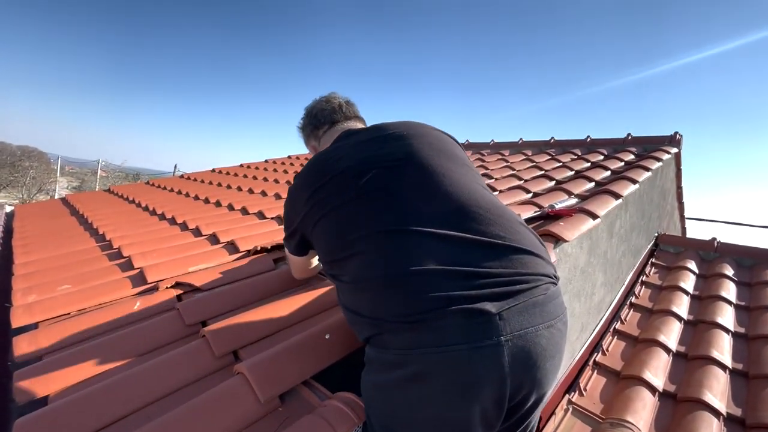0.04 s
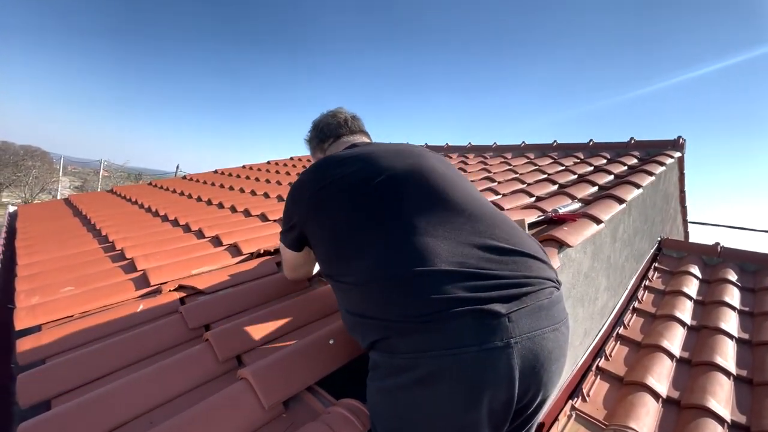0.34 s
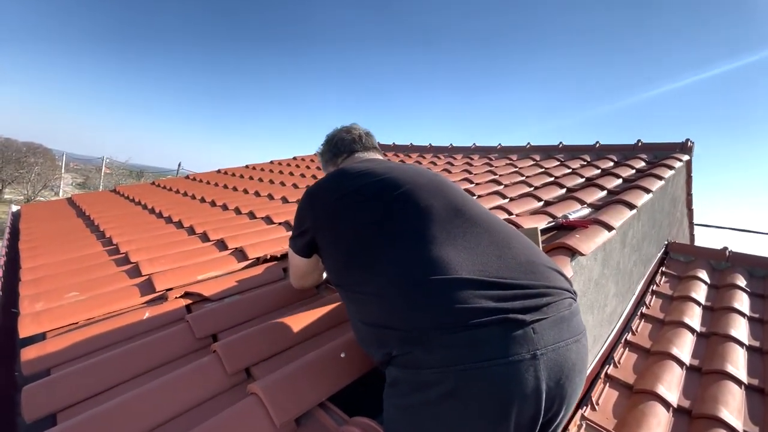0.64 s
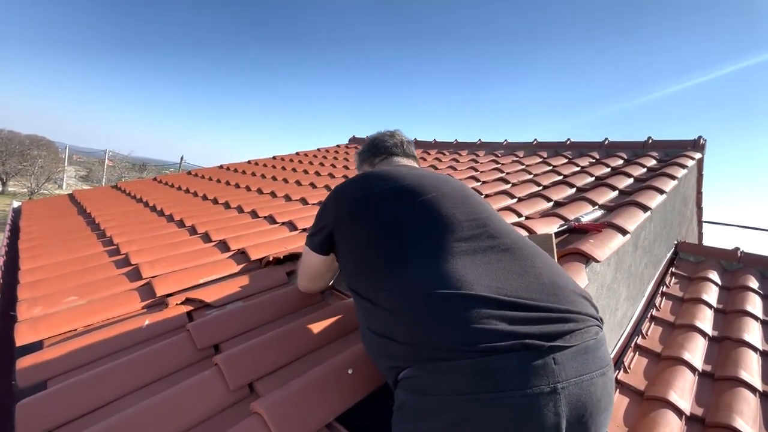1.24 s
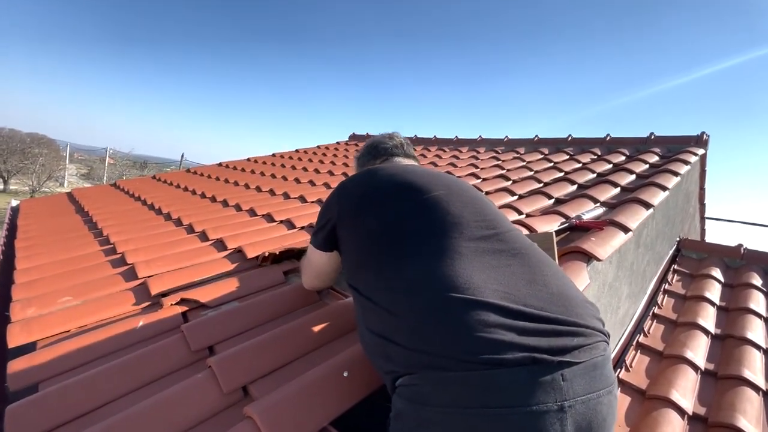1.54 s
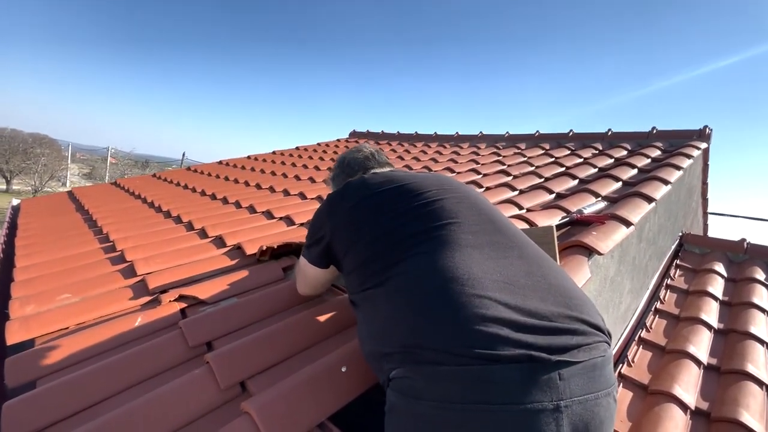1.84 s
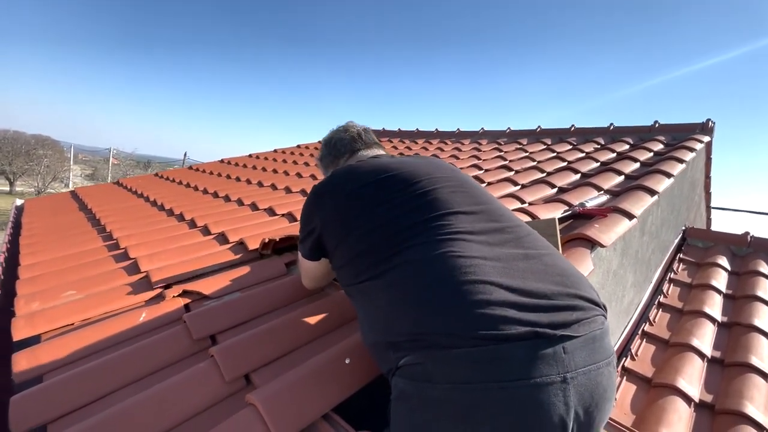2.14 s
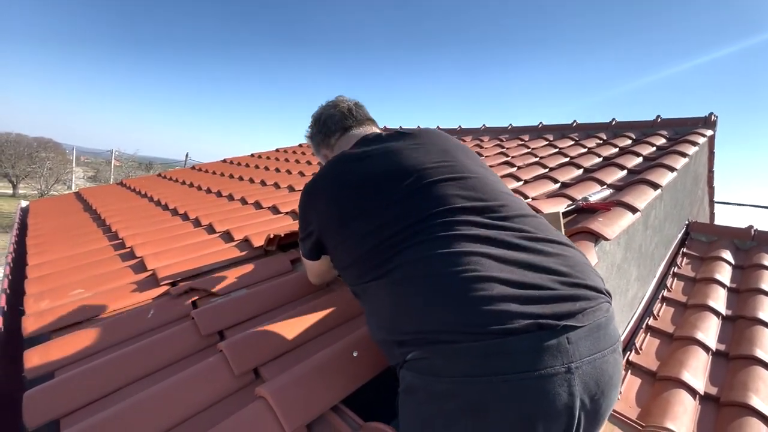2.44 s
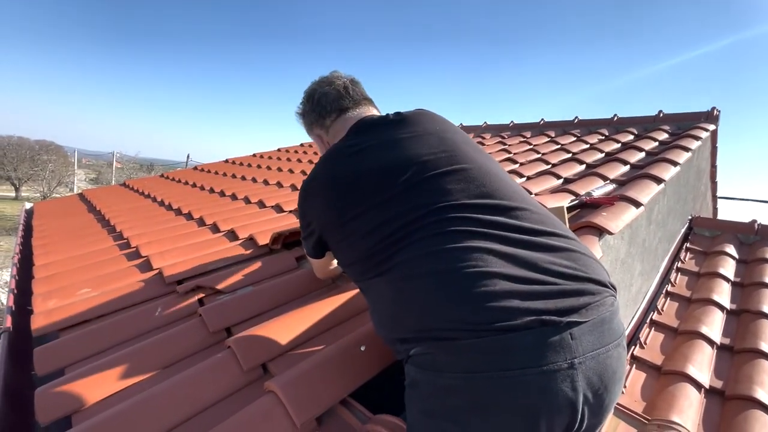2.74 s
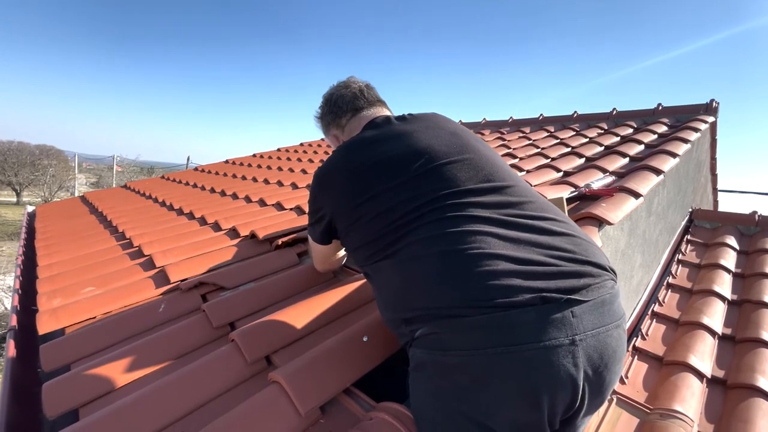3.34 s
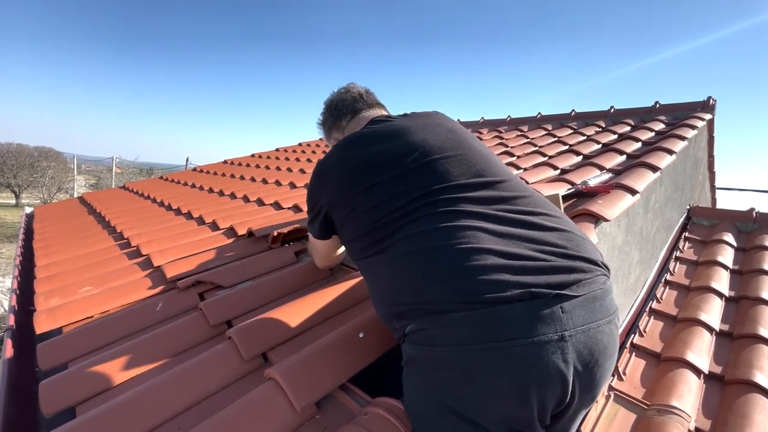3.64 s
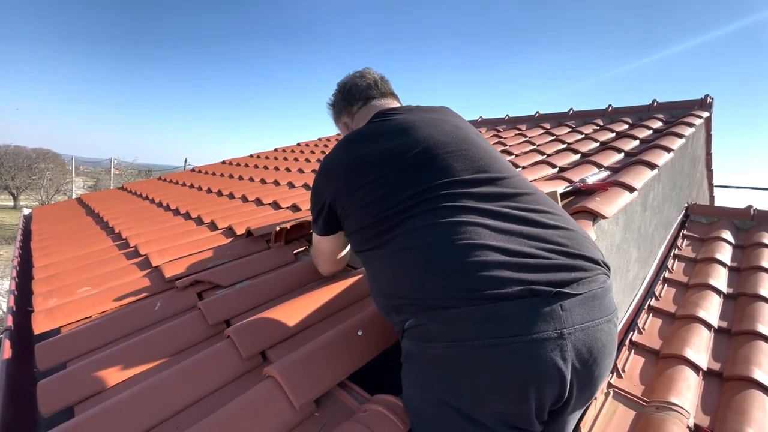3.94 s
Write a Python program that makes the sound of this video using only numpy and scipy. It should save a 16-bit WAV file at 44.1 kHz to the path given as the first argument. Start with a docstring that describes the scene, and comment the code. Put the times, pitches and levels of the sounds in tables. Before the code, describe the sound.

Clay roof tiles are shifted nearby, starting with faint taps and short scrapes. Clusters of hollow, briefly ringing knocks follow from about 1.3 to 2.1 seconds. After a lull, a loud clatter comes at 3.1, then a light wind gust on the microphone and a soft low thump at 3.4. More scrapes and knocks lead to another loud clatter at 3.9. Grit ticks occasionally over quiet open air.

```python
"""Clay roof tiles knock as they are shifted and set down on a pitched roof, a metre or two away.
Each knock rings the tile and rattles the hollow roof under it. Tiles scrape on each other in
streams of tiny impacts, and grit ticks between them. Behind the work: one soft low thump,
light wind on the microphone and quiet open air."""
import sys
import numpy as np
from scipy import signal
from scipy.fft import rfft, irfft, next_fast_len
from scipy.io import wavfile
from scipy.ndimage import uniform_filter1d

SR = 44100
rng = np.random.default_rng(int(sys.argv[2]) if len(sys.argv) > 2 else 0)


def digitize_waveform(pressure):
    """Quantize a signal to 16-bit integers and store it at the path in sys.argv[1].

    Rows of a 2-D input are taken as channels; values are limited to [-1, 1].
    """
    field = np.atleast_2d(pressure).T
    bounded = np.clip(field, -1, 1)
    quanta = np.round(bounded * 32767).astype(np.int16)
    wavfile.write(sys.argv[1], SR, quanta)


N = 176400
T = np.arange(N) / SR
RING_T = T[:int(.42 * SR)]


def undb(db):
    """Decibels to gain."""
    return 10 ** (np.asarray(db) / 20)


def unit(x):
    """Scale to rms 1."""
    return x / np.sqrt(np.mean(x ** 2) + 1e-18)


def fade(t, t60_s):
    """Exponential decay, 60 dB down at t60_s."""
    return np.exp(-np.log(1000) * t / t60_s)


def curve(t, points):
    """Interpolate (time_s, value) points."""
    return np.interp(t, *np.array(points).T)


def colour(x, points):
    """Minimum-phase filter through (freq_hz, gain_db) points."""
    size = next_fast_len(x.shape[-1] // 2 + 2048) * 2
    hz, db = np.array(points, float).T
    freqs = np.maximum(np.arange(size // 2 + 1) * SR / size, 1)
    gain = undb(np.interp(np.log(freqs), np.log(hz), db))
    cepstrum = irfft(np.log(gain))
    cepstrum[1:size // 2] *= 2
    cepstrum[size // 2 + 1:] = 0
    return irfft(rfft(x, size) * np.exp(rfft(cepstrum)), size)[..., :x.shape[-1]]


def walk(rate_hz, size):
    """Smooth random wander, rms 1."""
    hold = int(SR / rate_hz)
    steps = rng.standard_normal(size)[np.arange(size) // hold]
    return unit(uniform_filter1d(steps, hold))


def add(out, sound, start_s):
    """Mix a sound in at start_s."""
    i = int(start_s * SR)
    part = sound[:, max(-i, 0):max(N - i, 0)]
    out[:, max(i, 0):max(i, 0) + part.shape[1]] += part


# freq_hz, side_to_mid_db
STEREO_WIDTH = [(280,-9.5),(1000,-0.5),(8000,0),(12000,-2.5)]

def spread(pair, pan_db):
    """Two unrelated signals become left and right, alike in the bass."""
    mid = colour(pair[0], [(hz, -10 * np.log10(1 + 10 ** (db / 10))) for hz, db in STEREO_WIDTH])
    side = colour(pair[1], [(hz, -10 * np.log10(0.5 + 10 ** (-db / 10))) for hz, db in STEREO_WIDTH])
    return np.array([mid + side, mid - side]) * undb([[pan_db / 2], [-pan_db / 2]])


# freq_hz, gain_db
AIR_COLOUR = [(250,-8.5),(500,-9.5),(1400,-11),(2600,-27),(5500,-30.5),(8000,-40.5)]
# time_s, level_db
AIR_LEVEL = [(.1,-53.5),(.3,-58),(.55,-53)]

def open_air():
    """Faint countryside wash with one brief lull."""
    wash = unit(colour(rng.standard_normal((2, N)), AIR_COLOUR))
    return undb(curve(T, AIR_LEVEL)) * spread(wash, pan_db=2)


# freq_hz, gain_db
WIND_COLOUR = [(12,-26),(32,-15.5),(62,2),(100,-5),(170,-16.5),(1500,-69)]
# time_s, level_db
GUSTS = [(0,-46),(.35,-52.5),(.55,-39.5),(1,-44),(3.0,-52),(3.14,-31.5),(3.5,-53.5)]

def wind():
    """Light gusts buffet each microphone port on its own."""
    ports = np.array([unit(colour(rng.standard_normal(N), WIND_COLOUR)) for _ in range(2)])
    return ports * undb(curve(T, GUSTS)) * undb([[2], [-2]])


def thump(start_hz=132, end_hz=51, sag_s=0.0177, attack_s=0.0094, level_db=-17):
    """Soft low thump, sinking in pitch as it dies."""
    out = np.zeros((2, N))
    pitch_hz = end_hz + (start_hz - end_hz) * np.exp(-RING_T / sag_s)
    envelope = fade(RING_T, t60_s=0.14) * np.minimum(RING_T / attack_s, 1)
    boom = np.sin(2 * np.pi * np.cumsum(pitch_hz) / SR) * envelope
    add(out, undb(level_db) * np.array([boom, boom]), start_s=3.352)
    return out


# freq_hz, gain_db
TICK_COLOUR = [(2000,-2.5),(4200,13.5),(6500,6.5),(7400,1.5),(8500,4),(14000,2)]
# start_s, level_db
TICKS = [(.248,-61),(0.361,-58.5),(0.704,-53.5),(.759,-57.5),(1.378,-47),(1.912,-53.5),(2.037,-36),(2.965,-56),(3.489,-44),(3.937,-31.5)]

def grit(fine_per_s=11, fine_db=-13):
    """Sand cracks between tile edges: a few sharp ticks, plus fine ones during slides."""
    out = np.zeros((2, N))
    t = T[:SR // 10]
    fine_ticks = [(start_s + position * length_s, slide_db + fine_db - 10 * softness)
                  for start_s, length_s, slide_db, _ in SLIDES
                  for position, softness in rng.random((round(fine_per_s * length_s), 2))]
    for start_s, level_db in TICKS + fine_ticks:
        burst = rng.standard_normal((2, len(t))) * fade(t, t60_s=0.06)
        tick = colour(burst, TICK_COLOUR)
        tick = tick / np.std(tick[:, :SR // 200]) / np.sqrt(2)  # level set by the first 5 ms
        add(out, undb(level_db) * spread(tick, pan_db=3), start_s)
    return out


# time_s, left_minus_right_db
WORK_PAN = [(2.1,2),(3.1,2),(3.87,5)]

def place(pair, time_s):
    """Stereo position of the work, moving left near the end."""
    return spread(pair, curve(time_s, WORK_PAN))


# freq_hz, level_db
TILE_MODES = [(490,4),(612,2),(1000,7.5),(1163,4),(1465,0),(1830,9),(2315,13),(5230,11.5)]

def tile_ring(detune=0.0026, scatter_db=2.5):
    """Modes of a tile, slightly different wherever it is touched."""
    ring = 0
    for freq_hz, level_db in TILE_MODES:
        pitch_draw, level_draw = rng.standard_normal(2)
        phase = 2 * np.pi * (freq_hz * (1 + detune * pitch_draw) * RING_T + rng.random((2, 1)))
        ring = ring + undb(level_db + scatter_db * level_draw) * np.sin(phase)
    return ring * fade(RING_T, t60_s=0.12)


# freq_hz, gain_db
SLIDE_COLOUR = [(80,-7),(250,7.5),(700,3),(1700,0.5),(2800,-15),(6300,-17),(7400,-29),(8600,-25),(10500,-34.5),(14000,-31.5)]
# start_s, length_s, level_db, brightness_db
SLIDES = [(-.1,0.25,-53.5,14),(0.554,0.075,-33.5,2),(0.856,0.079,-35.5,3.5),(1.068,0.15,-41.5,0),(1.333,0.096,-46,6),
          (2.008,0.088,-30.5,0),(2.159,0.059,-38.5,10),(2.491,0.344,-54,14),(3.022,0.066,-31,1),(3.119,0.24,-38,-3),(3.427,0.089,-35.5,2),(3.5,0.14,-39,1.5),(3.715,0.082,-32.5,1.5),(3.907,0.045,-37,10)]

def slides(grains_per_s=3000, scatter_db=6.5, judder_db=2.5, ring_db=-10.5, release_s=0.024):
    """Rough clay catches and slips: a swelling, juddering stream of tiny impacts rings the tile."""
    out = np.zeros((2, N))
    size = len(RING_T)
    for start_s, length_s, level_db, brightness_db in SLIDES:
        clatter = rng.standard_normal((2, size)) * fade(RING_T, t60_s=0.041)
        ring = unit(colour(tile_ring(), SLIDE_COLOUR))
        body = unit(colour(clatter, SLIDE_COLOUR)) + undb(ring_db) * ring
        body = place(body / np.sqrt(np.sum(body ** 2)), start_s)
        impacts = (rng.random(size) < grains_per_s / SR) * rng.choice([-1, 1], size)
        strength = undb(scatter_db * np.clip(rng.standard_normal(size), -2, 2))
        swell = np.minimum(RING_T / (0.6 * length_s), 1)
        release = np.exp(-np.maximum(RING_T - length_s, 0) / release_s)
        judder = undb(judder_db * walk(rate_hz=54.5, size=size))
        rub = undb(level_db) * unit(impacts * strength) * swell * release * judder
        scrape = signal.fftconvolve(rub[None], body, axes=1)[:, :size]
        tilt = [(400, -brightness_db / 2), (1400, 0), (6500, brightness_db)]
        add(out, colour(scrape, tilt), start_s)
    return out


def contact(x, spacing_hz=95, depth_db=4.2):
    """The point of contact favours some resonances and mutes others."""
    freq_hz = np.cumsum(spacing_hz * np.geomspace(1, 5, 70))
    gain_db = depth_db * np.clip(rng.standard_normal(len(freq_hz)), -2, 1.3)
    return colour(x, np.column_stack([freq_hz, gain_db - np.mean(gain_db)]))


def spot_note(pitch_hz, overtone_ratio=2.98, overtone_db=-16):
    """Short, clear ring of the struck spot, with one overtone."""
    phase = 2 * np.pi * (pitch_hz * RING_T + rng.random((2, 1)))
    tone = np.sin(phase) + undb(overtone_db) * np.sin(overtone_ratio * phase)
    return tone * fade(RING_T, t60_s=0.105)


# freq_hz, gain_db
KNOCK_COLOUR = [(30,-21.5),(140,-13),(230,-2.5),(550,-0.5),(820,-3.5),(1500,-6),(2100,-12),(3000,-20),(6600,-30),(7600,-47.5)]
# start_s, level_db, hardness_db, pitch_hz
KNOCKS = [(.036,-38.5,-14,1096),(.053,-39.5,-22,601),(.496,-42.5,-5,840),(.584,-29,-12,245),(1.006,-26,-7.5,282),
          (1.297,-24.5,-12,1760),(1.327,-18,-10,1475),(1.339,-25.5,0,490),(1.430,-28,-20,1175),(1.634,-16.5,-19.5,970),(1.74,-24.5,2.5,1395),(1.765,-20,-10.5,479),(1.776,-25,-37,496.5),
          (2.023,-25,2,958),(2.074,-15.5,-7,931),(2.087,-23,-5.5,1090),(2.624,-42.5,12,1795),(2.726,-47.5,10,1320),(3.082,-9.5,-6.5,1294),(3.095,-12,2,583),(3.109,-11,-8,431.6),
          (3.527,-30,-11,346),(3.544,-22,-7,595),(3.564,-26,-13,1294),(3.669,-32.5,-43,502),(3.783,-21.5,-11,1292),(3.868,-8,-2.5,642),(3.884,-10.5,-2.5,1372),(3.938,-18,-4,556)]

def knocks(attack_s=0.0014, crack_db=1.5, roof_db=-16.5, rattle_db=4.5, ring_db=-7, note_db=-4):
    """A crack of contact rattles the interlocked tiles; the tile rings, the hollow roof dies away."""
    out = np.zeros((2, N))
    size = len(RING_T)
    rise = 1 - np.exp(-RING_T / attack_s)
    crack = undb(crack_db) * fade(RING_T, t60_s=0.06)
    blow = fade(RING_T, t60_s=0.19)
    roof = undb(roof_db) * fade(RING_T, t60_s=0.64)
    envelope = rise * (crack + blow + roof)
    for start_s, level_db, hardness_db, pitch_hz in KNOCKS:
        rattle = undb(rattle_db * np.tanh(walk(rate_hz=260, size=size)))
        clatter = unit(colour(rng.standard_normal((2, size)) * envelope * rattle, KNOCK_COLOUR))
        ring = unit(colour(tile_ring() * rise, KNOCK_COLOUR))
        body = unit(contact(clatter + undb(ring_db) * ring))
        note = unit(spot_note(pitch_hz) * rise)
        hit = place(body + undb(note_db) * note, start_s)
        hit = hit / np.std(hit[:, :SR // 40]) / 2  # level set by the first 25 ms
        # More bass for gentle knocks, slightly more for high notes.
        bass_db = 0.217 * (-15.5 - level_db) + 0.5 * np.log2(pitch_hz / 806)
        shelves = [(400, bass_db), (1000, 0), (1600, 0), (3500, hardness_db)]
        add(out, undb(level_db) * colour(hit, shelves), start_s)
    return out


def scene():
    """Roof work in the open air."""
    return knocks() + slides() + grit() + thump() + wind() + open_air()


def record(dry):
    """Steep low-pass on the top treble."""
    cutoff_hz = 15500
    return signal.sosfilt(signal.ellip(8, .2, 80, cutoff_hz, fs=SR, output="sos"), dry)


dry = scene()
out = record(dry)
digitize_waveform(out)
```